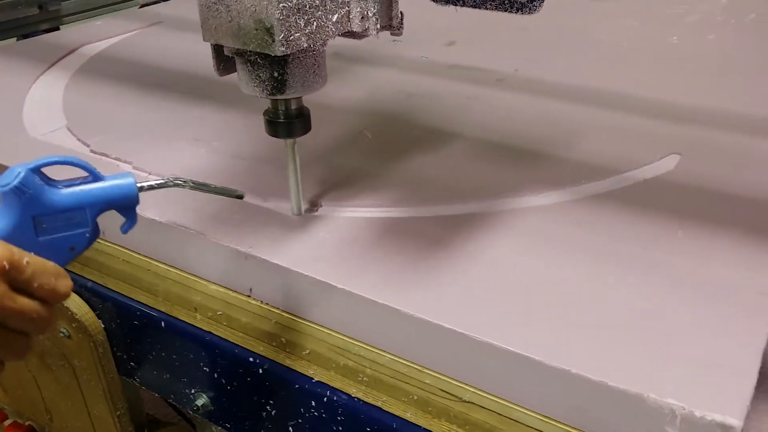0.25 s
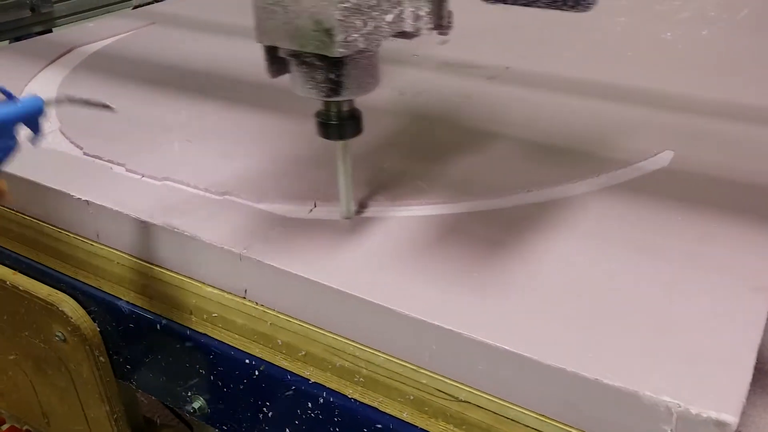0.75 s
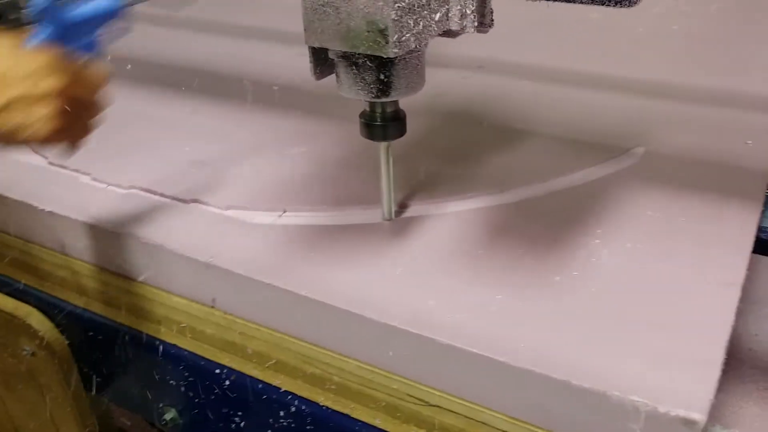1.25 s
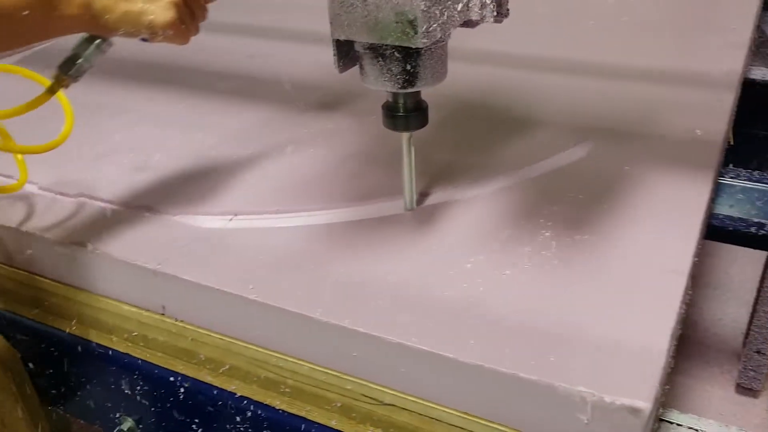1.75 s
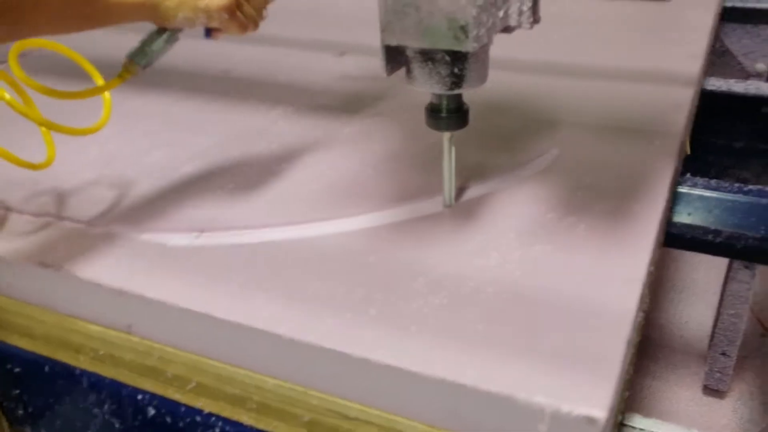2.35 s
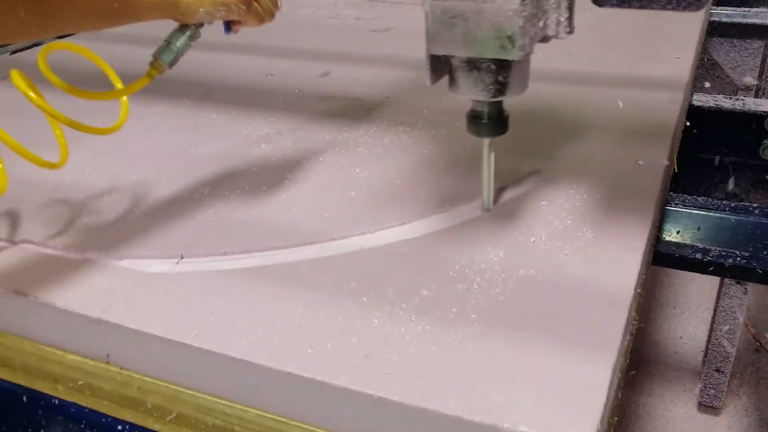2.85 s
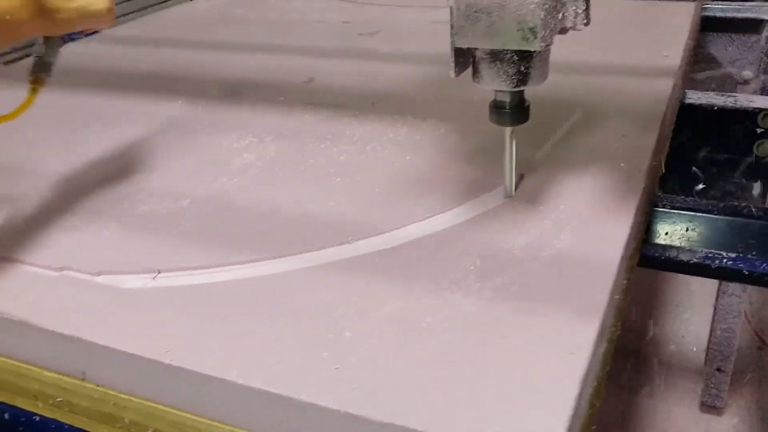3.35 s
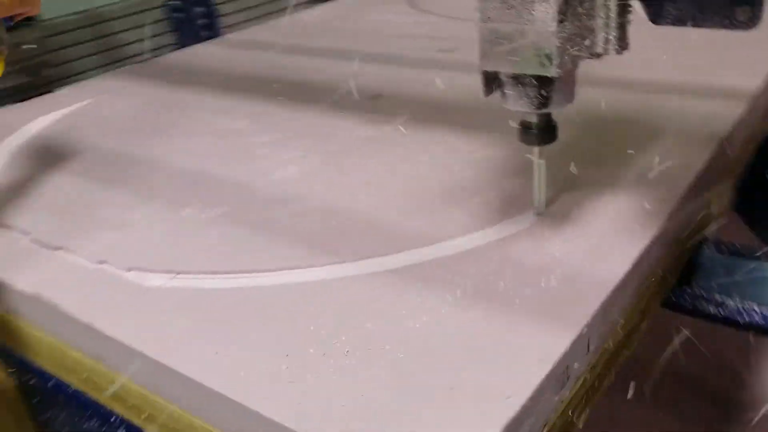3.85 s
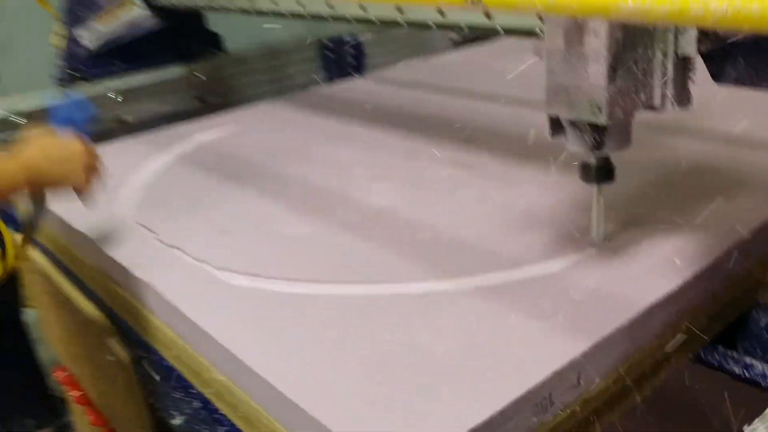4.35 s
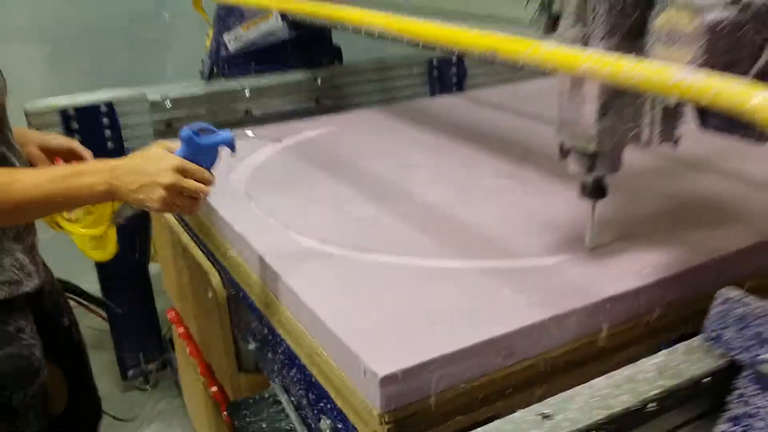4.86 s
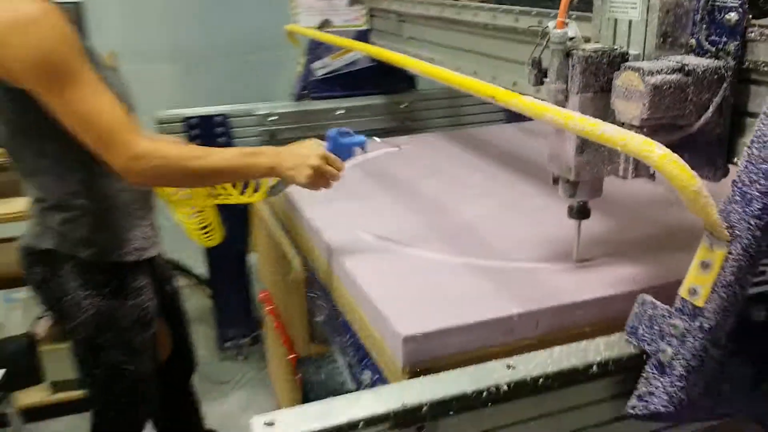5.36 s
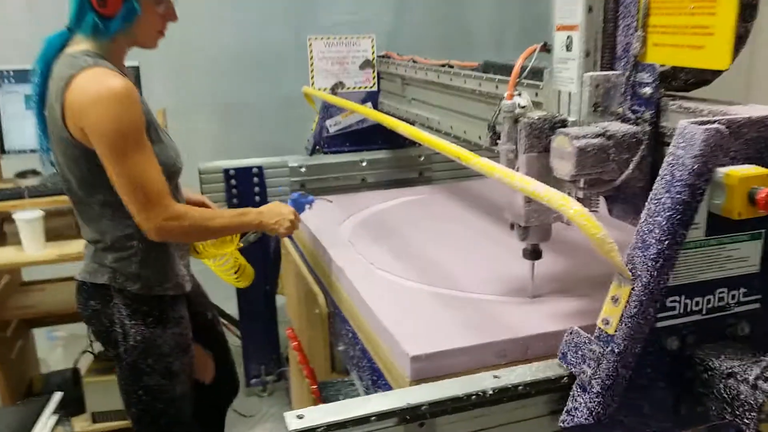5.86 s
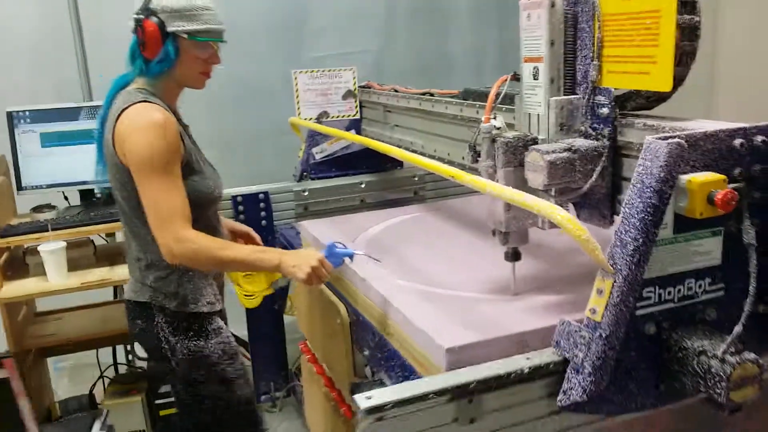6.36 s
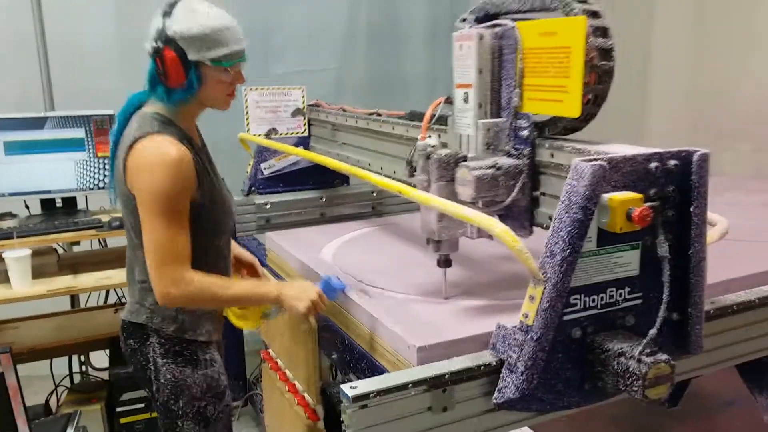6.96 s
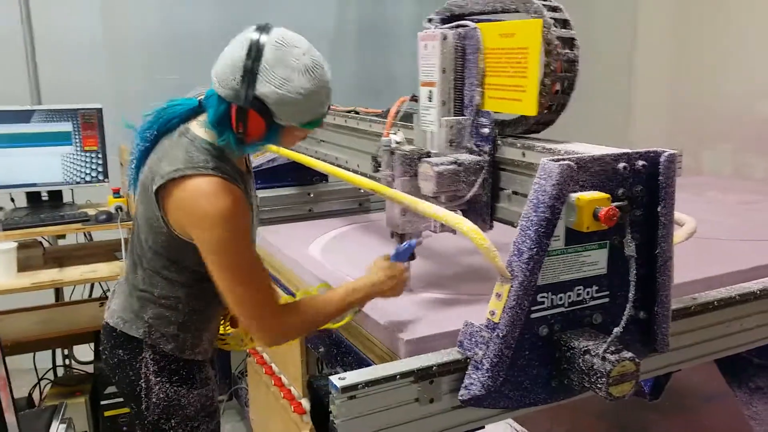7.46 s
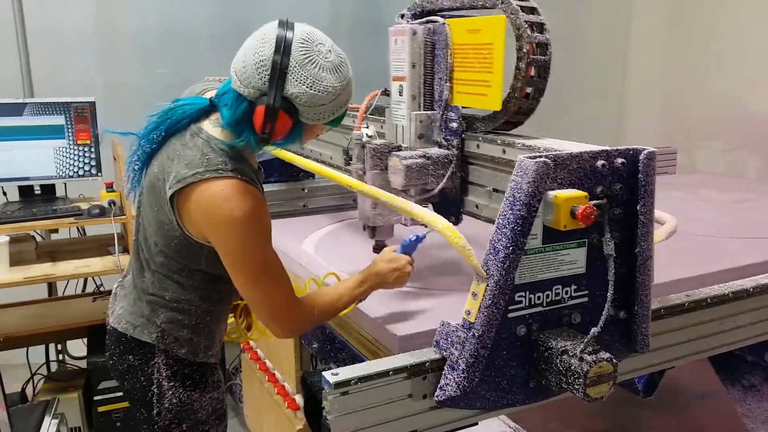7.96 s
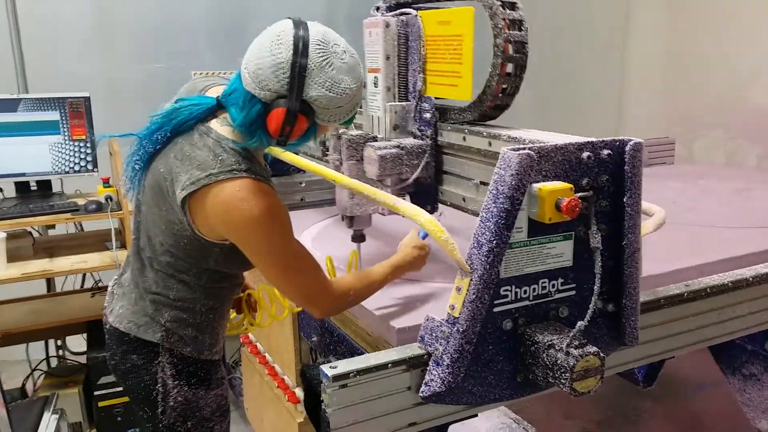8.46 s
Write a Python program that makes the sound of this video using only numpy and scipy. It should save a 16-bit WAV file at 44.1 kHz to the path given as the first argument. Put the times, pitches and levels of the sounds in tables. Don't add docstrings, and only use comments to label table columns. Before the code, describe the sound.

A router spindle whines steadily throughout, about 300 hertz with higher buzzing overtones and a fine gritty rasp of foam being torn. At 0.15 s a loud bright air-gun hiss opens, easing and fading by 1.4 s. A second squeeze starts near 1.5 s, pulsing harder at 2.3 to 2.5 s, dipping, then blasting strongly from 2.9 s, with splashes, short hollow whoops from the groove and a low wind thump at 3.14 s. The hiss dies by 4.1 s; the cutter labours with a rough buzz until 4.5 s and shop hum and rumble emerge. Air returns at 5.1 s in a long, steadier hiss to 7.2 s, then a short burst from 7.65 to 8.2 s with a low whoop, and another begins at 8.5 s, cut off at the end. Handheld microphone, stronger on the right, with slightly watery, compressed background.

```python
import sys
import numpy as np
from scipy import signal
from scipy.fft import rfft, irfft, next_fast_len
from scipy.io import wavfile
from scipy.ndimage import uniform_filter1d

SR = 44100
rng = np.random.default_rng(int(sys.argv[2]) if len(sys.argv) > 2 else 0)


def amplitude_ratio(level_db):
    exponent = np.asarray(level_db, float) / 20
    return 10 ** exponent


def wav_out(sig):
    wavfile.write(sys.argv[1], SR, np.round(np.clip(np.atleast_2d(sig).T, -1, 1) * 32767).astype(np.int16))


N = 384993

# (time [s], flow [dB], share striking board [dB], loudest
# band [Hz], focus [dB])
SQUEEZES = [
    (0, -32.5, -7, 8000, -8),
    (.16, -25.5, -4, 7300, -3),
    (.22, -18, -9.5, 7860, -1),
    (.36, -18.5, -11, 7300, 3),
    (.56, -17.5, -12, 9700, 1.5),
    (.72, -19.5, -16.5, 8000, -1.5),
    (1.03, -22, -7, 8100, -1.5),
    (1.08, -29, -4, 7200, 3.5),
    (1.38, -33.5, -2.5, 7700, -4),
            (1.47, -29.5, -6, 7100, 1.5),
    (1.56, -18.5, -10, 10400, 0.5),
    (1.66, -20, -7.5, 8600, 4),
    (1.82, -20.5, -5, 8800, 0),
    (2.05, -18, -5.5, 8260, 3.5),
    (2.11, -19.5, -9.5, 8700, 5),
            (2.26, -19, -6, 7900, 3),
    (2.295, -15.5, -8.5, 8260, 3.5),
    (2.47, -16.5, -8.5, 7900, 4.8),
    (2.53, -20.5, -7.5, 9050, 1),
            (2.74, -21, -8, 9700, -1),
    (2.84, -20, -8.5, 9300, 5),
    (2.909, -16, -11.5, 8000, 2.5),
    (3.04, -15.5, -26, 10300, 6),
    (3.3, -17, -9, 8750, 1),
    (3.67, -22, -7, 8760, 1),
    (4.0, -24, -15.5, 7760, -2.5),
    (4.13, -36.5, -3, 7640, 5),
    (4.5, -35, -13, 7300, 2.5),
            (4.58, -45.5, -9, 6900, 3.6),
    (4.9, -36, -10.5, 7300, 10),
    (5.12, -25, -7, 7900, 6.9),
    (5.22, -17.5, -10.5, 7430, 8.9),
    (5.4, -19, -11.5, 7600, 9.2),
    (5.78, -21, -13, 9130, 0.81),
    (6.538, -22, -9, 8550, 4.4),
    (6.78, -20.5, -10, 9030, 4.2),
    (7.16, -21, -9.5, 9000, 2.6),
            (7.4, -32, -1.5, 7560, 2.1),
    (7.62, -34, -3, 7900, 3.1),
    (7.645, -23, -8.5, 7640, 7),
    (7.8, -20, -5.5, 8250, 6.2),
    (8.09, -21, -6, 8800, 7.3),
    (8.3, -33, -5, 8300, 3.5),
            (8.485, -34.5, -5, 8200, 6.9),
    (8.52, -29, -3.5, 7950, 8.1),
    (8.66, -20, -11, 8400, 3.2),
    (8.73, -19.5, -13.5, 8700, 3.9),
]
# (time [s], length [s], roar [dB],
# spent air at camera [dB], splash [dB])
SWEEPS = [(0.135, 0.12, -44, -38.5, -42), (0.671, 0.042, -30, -34.5, -26), (1.543, 0.03, -32.5, -55, -27),
          (1.612, 0.083, -29, -69, -22), (2.03, 0.047, -58, -61, -42), (2.144, 0.029, -60, -41.5, -48),
          (2.696, 0.077, -44.5, -60, -36), (2.907, 0.053, -41.5, -72.5, -21),
          (2.982, 0.12, -34.5, -36.5, -30.5), (3.16, 0.063, -36.5, -36.5, -28), (5.15, 0.3, -69, -34, -44),
          (6.956, 0.12, -40.5, -61, -30.5), (7.798, 0.14, -32, -47, -32.5), (8.006, 0.035, -32.5, -73, -23)]
# (time [s], length [s], frequency [Hz], level [dB])
WHOOPS = [
    (1.326, .12, 3350, 9),
    (1.586, 0.09, 2740, 4),
    (2.905, 0.055, 4850, 6),
    (7.782, 0.25, 713, 9.5),
    (7.99, 0.037, 3740, 8),
]
# (frequency [Hz], level [dB/Hz])
HISS_SPECTRUM = [(2500, -20), (4000, -10.5), (5000, -5.5), (6000, -5), (7600, -2), (9000, -3), (10500, -1),
                 (12000, -4), (14400, -6), (15000, -26)]
SPLASH_SPECTRUM = [(1500, -46.5), (1950, -7), (2150, -8), (2500, -3.5), (3200, -2.5), (5000, -5.5),
                   (7000, -5), (9000, -33.5)]
ROAR_SPECTRUM = [(500, -14), (800, -7.5), (1150, 0), (1300, -5.5), (1700, -1.5), (1900, -10), (2300, -2),
                 (3200, -34.5)]
# (time [s], delay [ms], ripple [dB])
BOUNCE = [(0, 0.6, -1), (.55, 0.88, 1), (1.2, 0.53, -1), (1.9, 0.27, -1.5), (2.3, 0.24, -1), (2.6, 0.31, 0),
          (2.85, 0.43, 2), (3.05, 0.47, 3), (3.4, 0.41, 1), (3.75, .39, -1), (4.0, 0.33, 0),
          (7.6, 0.44, 0.5), (7.95, 1, -4.5), (8.3, .5, 0.5)]
# (time [s], level [dB])
SHADE = [(0, -6.5), (1.0, -0.5), (2.4, -1.5), (3.3, -1), (4.2, -1), (5.4, 3.5), (5.8, 0.5), (7.2, -1.5),
         (8.73, -0.5)]
# (time [s], flute bite [dB], bite sharpness [dB], runout [dB], unbalance [dB])
CUT = [(0, -36.5, -11.5, 0.5, -10), (.4, -46, 3, 0.5, 1), (.75, -38, -2, -9.5, -7.5),
       (1.2, -35, -6.5, -11, -6.5), (1.55, -36, -7.5, -7.5, -9.5), (1.9, -41.5, -3, -3, -3),
       (2.5, -51, 3.5, 6, 3.5), (2.9, -53, 9, 10.5, 6), (3.45, -54.5, 5.5, 7, 6),
       (3.9, -44.5, 0.5, 0.5, -5), (4.6, -56.5, -2.5, -2, 9), (5.1, -44, 3.5, 0, 2),
       (5.5, -45, -11, -11, -9), (6.3, -53, 5, 1, -3.5), (6.9, -45, -4.5, -1, -17.5),
       (7.3, -38, -13, -6, -10.5), (7.75, -39, -11, -9, -9.5), (8.2, -46.5, -5, -7.5, -15)]
# (start [s], end [s], load [dB])
LOADS = [
    (-.1, 0.2, 9.5),
    (4.02, 4.541, 15),
]
# (shaft order, level [dB])
UPPER_ORDERS = [(5, -8), (6, -6.5), (7, -6.5), (8, -6.5), (9, -5), (10, -9), (12, -9), (14, -14),
                (16, -5.5), (17, -2), (18, -7), (19, -3.5), (20, -3), (21, -4), (22, 1), (23, -2), (24, -2),
                (26, -4), (27, -1), (28, -3), (29, -6), (30, -9)]
# (frequency [Hz], level [dB/Hz])
GRIT_SPECTRUM = [(900, -33), (1700, -19), (2400, -21.5), (3000, -4), (3600, -14), (4500, -6), (5400, -8),
                 (6200, -6.5), (9000, -3), (15000, -59.5)]
# (multiple of flute rate, level [dB])
STROKES = [(3, -10.5), (4, -6), (5, -8.5), (6, -4), (7, -9.5), (8, -9.5), (9, 0), (10, -8), (11, -14)]
# (time [s], flute rate [strokes/s])
FLUTE_RATE = [(0, 590), (.3, 596), (4.0, 586), (4.2, 590), (4.38, 594), (4.5, 598.5), (8.73, 599)]
# (time [s], peak [dB], length [s])
GUSTS = [
    (3.139, -12, 0.0033),
    (3.147, -8, 0.007),
    (1.3, -40, 0.013),
    (4.9, -34, 0.018),
]
# (frequency [Hz], level [dB], width [Hz])
DRIVE_TONES = [(120.2, 0, 1.5), (815, 0, 10), (870, -54, 3), (6540, -60, 8.6), (6780, -55, 16)]
# (time [s], hum [dB], drone [dB], gantry motor [dB])
HEARD = [(0, -46, -57.5, -49), (.4, -63.5, -57, -60), (1.1, -50, -57.5, -55), (1.5, -52, -52, -61),
         (1.9, -59, -57.5, -59), (3.4, -66, -66, -57), (3.75, -63, -48.5, -56), (4.2, -55, -57, -64),
         (4.6, -47, -56.5, -52.5), (5.2, -39.5, -48.5, -45), (5.6, -56.5, -62.5, -43),
         (6.1, -49.5, -53, -50.5), (6.45, -45, -63.5, -56), (6.7, -49, -47.5, -46.5),
         (7.0, -58, -55.5, -59), (7.3, -42, -53, -65), (7.7, -44, -45, -48), (8.2, -54, -55, -59)]
# (frequency [Hz], level [dB/Hz])
RUMBLE_SPECTRUM = [(15, -57), (30, -9), (86, 0), (113, -3), (129, 4.5), (155, -15.5), (192, -5.5),
                   (241, -9.5), (290, -3), (380, -29.5), (640, -120)]
# (time [s], nearness [dB], left port earlier [ms], jet left-right [dB])
CAMERA = [(0, 7.5, 0.15, -13), (.9, 1.5, 0.21, -9.5), (1.2, 0.5, 0.044, -8.5), (2.8, 0, 0.027, -7.5),
          (3.6, 1.5, 0.17, -8.5), (4.1, 1.5, -0.052, -11), (4.7, -8, -0.085, -8.5), (5.2, 8.5, -0.064, -7),
          (5.7, -6, 0.025, -11.5), (6.5, -7.5, 0.079, -11.5), (7, -3, 0.074, -13), (7.6, -0.5, 0.0036, -12),
          (8.2, -2, 0.075, -10.5), (8.73, -21, 0.012, -13)]
# (frequency [Hz], left-right likeness [0-1])
ALIKE = [(60, 0.95), (600, 0.8), (1500, 0.35), (4000, 0.36), (8000, 0.2), (12000, 0.18)]
# (frequency [Hz], left-right [dB])
LEAN = [(40, -2), (200, -5), (700, -6.5), (2300, -9.5), (4300, -5.5), (8000, -8), (13000, -5.5)]
# (frequency [Hz], level [dB])
LEFT_PORT = [(1600, 1), (2500, -2), (5200, -1), (6600, 5.5), (7600, -1.5), (10600, -3.5), (12000, -1),
             (14400, 2)]
# (frequency [Hz], level re moment's loudness [dB])
STARVE = [(50, -23), (300, -23.5), (450, -19), (600, -25), (1000, -20), (1150, -22.5), (1330, -21.5),
          (1650, -23.5), (1900, -21.5), (2150, -24), (5000, -31)]
# (frequency [Hz], level [dB/bin])
FAINT = [(7000, -73), (8500, -52), (10500, -47), (12500, -41), (14400, -48), (14650, 0)]
# (start [s], end [s], low [Hz], high [Hz])
DROPOUTS = [(.35, .44, -2, 540), (.44, .62, -9, 210), (.62, .78, 0, 139.7), (1.58, 2.06, -2, 230),
            (2.29, 2.46, -6, 555), (2.46, 2.54, -3, 200), (2.899, 2.99, 0, 500), (3.095, 3.185, 4300, 4640),
            (3.22, 3.33, 330, 600), (3.3, 3.55, 0, 240), (3.6, 3.75, -2, 240), (3.404, 3.56, 0, 560),
            (3.56, 3.6, 237, 540), (3.57, 3.72, 340, 549), (5.657, 5.77, 953, 1530),
            (7.798, 7.85, 170, 400), (7.85, 7.94, 0, 250), (7.9, 7.95, 0, 420), (7.93, 8.0, 200, 480),
            (6.079, 6.3, 345, 545), (2.0, 2.16, 670, 800), (.72, 1.0, 345, 540), (8.0, 8.123, -11, 230)]
# (frequency [Hz], level re neighbouring bins [dB])
COARSE = [(200, -13), (1400, -9), (3400, -7), (5700, -9), (7500, -14), (10000, -14), (13000, -8)]

FRAME, HOP, HOP_OFFSET = 512, 1024, 191
ROAR_PER_SHARE_DB, ROAR_DB, IDLE_ROAR_DB = 1.65, -7.5, -43.5
TILT_DB, TILT_PER_AIM_OCT_DB, TILT_PER_FLOW_DB = -1, 4.8, 0.2
GROOVE_HZ, GROOVE_DROP_HZ_PER_DB = 4000, 80
SHADE_HZ, LEFT_FOCUS, STREAK_DB = 11460, 0.33, 0.87
SHAFT_HZ = 299.75
ORDER_DB = (0.3, 0.15, 0.24, 0.33)
WHINE_DB, BRAKE_DB_PER_DB = -45.5, 0.07
GRIT_DB, GRIT_PER_BITE_DB = -39.5, 0.3
STROKE_DB, STROKE_LEFT_DB = -46.5, -3.5
LOAD_EDGE_S, SQUEAL_RISE_DB_PER_S = 0.025, 18
HEARD_LEAST_DB, HUM_DB, MOTOR_DB, DRONE_DB = -66, -1.5, -3.5, 1.5
# level, share of nearness, ducking per dB of flow, spent air heard in each
SHOP_DB, SHOP_NEAR = (-49, -55, -47.5), (0.068, 0.17, 0.63)
DUCK, SPILL_DB = (1, 0.22, 0.57), (-5, -17.5, -7)
QUIET_DB, DUCK_NEAR = -25, 0.68
LEFT_STARVE_DB = 1.07


def unit(x):
    return x / np.sqrt(np.mean(x ** 2) + 1e-20)


def along(points, hz):
    f, v = np.transpose(points)
    return np.interp(np.log(hz + 1), np.log(f + 1), v)


def curves(rows, t=None):
    s, *cols = np.transpose(rows)
    t = np.arange(N) / SR if t is None else t
    return [np.interp(t, s, col) for col in cols]


def wobble(rate_hz, channels=1):
    at = np.arange(N) * rate_hz / SR
    knots = rng.standard_normal((channels, int(N * rate_hz / SR) + 4))
    return np.array([np.interp(at, np.arange(len(row)), row) for row in knots])


def filtered(x, response):
    m = next_fast_len(N + 8192)
    return irfft(rfft(x, m) * response(np.fft.rfftfreq(m, 1 / SR)), m)[..., :N]


def smooth(x, hz_bins, frames):
    return uniform_filter1d(uniform_filter1d(x, size=hz_bins, axis=-2), size=frames, axis=-1)


def rush(spectrum, patchy_db, shape_db=None, ports_db=None):
    hz, t, z = signal.stft(rng.standard_normal((2, N)), SR, nperseg=FRAME)
    rows = hz[:, None]
    patches = unit(smooth(rng.standard_normal(z.shape[1:]), 6, 12))
    moving_db = shape_db(rows, t) if shape_db else 0 * t
    colour = amplitude_ratio(along(spectrum, hz)[:, None] + moving_db)
    colour = colour / np.sqrt(np.mean(colour ** 2, axis=0)) * amplitude_ratio(patchy_db * patches)
    turn = np.arccos(np.clip(along(ALIKE, hz), 0, 1))[:, None] / 2
    mid = z[0] * np.cos(turn) * colour
    side = z[1] * np.sin(turn) * colour
    lead = np.exp(2j * np.pi * rows * curves(CAMERA, t)[1] / 1000)
    pair = np.array([(mid + side) * lead, mid - side])
    if ports_db:
        pair = pair * amplitude_ratio(ports_db(rows, t))
    return unit(signal.istft(pair, SR, nperseg=FRAME)[1][:, :N])


def band(lo_hz, hi_hz):
    return [(lo_hz * 0.93, -40), (lo_hz, 0), (hi_hz, 0), (hi_hz * 1.1, -40)]


def narrow(lines):
    def shape(f):
        return sum(amplitude_ratio(db) / np.sqrt(width) / (1 + ((f - hz) / width) ** 2) for hz, db, width in lines)
    return np.sqrt(SR / np.pi) * filtered(rng.standard_normal((2, N)), shape)


def jet(t=None):
    return curves(SQUEEZES, t)


def sweeps(axis):
    t = np.arange(N) / SR
    return sum(amplitude_ratio(row[axis]) * np.exp(-((t - row[0]) / row[1]) ** 2) for row in SWEEPS)


def whoops(hz, t):
    return sum(db * np.exp(-((t - s) / length) ** 2 - ((hz / ring_hz - 1) / 0.35) ** 2)
               for s, length, ring_hz, db in WHOOPS)


def groove(hz, t):
    hollow_hz = GROOVE_HZ - GROOVE_DROP_HZ_PER_DB * jet(t)[1]
    return whoops(hz, t) + 3 * np.exp(-((hz - hollow_hz) / 600) ** 2)


def beam(hz, t):
    _, _, peak_hz, focus_db = jet(t)
    return focus_db * np.exp(-((hz - peak_hz) / 900) ** 2)


def aim(hz, t):
    flow_db, _, peak_hz, _ = jet(t)
    tilt = TILT_DB + TILT_PER_FLOW_DB * (flow_db - QUIET_DB) + TILT_PER_AIM_OCT_DB * np.log2(peak_hz / 8300)
    return beam(hz, t) + tilt * np.log2(np.clip(hz, 3000, 15000) / 8000)


def hiss_at_ports(hz, t):
    delay_ms, ripple_db = curves(BOUNCE, t)
    ripple = ripple_db * np.cos(2 * np.pi * hz * delay_ms / 1000)
    unfocus = (LEFT_FOCUS - 1) * beam(hz, t)
    shade = curves(SHADE, t)[0] / (1 + np.exp((SHADE_HZ - hz) / 150))
    streaks = unit(smooth(rng.standard_normal((2, len(hz), len(t))), 3, 40))
    return np.array([ripple + unfocus, 0.67 * ripple + shade]) + STREAK_DB * streaks


def air_gun():
    flow_db, board_db, *_ = jet()
    near_db, _, pan_db = curves(CAMERA)
    flutter = wobble(16)

    hiss_gain = amplitude_ratio(flow_db + 0.3 + 0.036 * flutter + 0.52 * wobble(90))
    hiss = hiss_gain * rush(HISS_SPECTRUM, patchy_db=1.5, shape_db=aim, ports_db=hiss_at_ports)
    hiss = hiss * amplitude_ratio(np.array([pan_db + 8.5, -pan_db - 6.5]) / 2)

    splash_gain = np.hypot(amplitude_ratio(flow_db + board_db + 1.12), sweeps(axis=4))
    splash_gain = splash_gain * amplitude_ratio(0.1 * flutter + 0.76 * wobble(50))
    splash = splash_gain * rush(SPLASH_SPECTRUM, patchy_db=1.0, shape_db=groove)

    blown = amplitude_ratio(flow_db + ROAR_PER_SHARE_DB * board_db + ROAR_DB)
    idle = amplitude_ratio(IDLE_ROAR_DB + 0.48 * near_db)
    roar_gain = np.sqrt(blown ** 2 + idle ** 2 + sweeps(axis=2) ** 2) * amplitude_ratio(0.12 * wobble(17))
    roar = roar_gain * rush(ROAR_SPECTRUM, patchy_db=1.5, shape_db=whoops)
    return hiss + splash + roar


def shaft_tones(turn):
    bite_db, sharp_db, runout_db, shake_db = curves(CUT)
    drive_db = bite_db + shake_db, bite_db, bite_db + runout_db, bite_db + sharp_db
    tones = 0
    for k, db in enumerate(ORDER_DB):
        level = amplitude_ratio(db + drive_db[k] + 1.1 * wobble(4.5, channels=2))
        tones = tones + level * np.sin((k + 1) * turn + 0.7 * wobble(4, channels=2))
    return tones


def shaft_whine():
    fading = [(k, -6 - 0.4 * (k - 30)) for k in range(31, 48)]
    return narrow([(k * SHAFT_HZ, db, 4 + 0.21 * k) for k, db in UPPER_ORDERS + fading])


def flute_grit(turn):
    bite = np.exp(1.8 * np.cos(2 * turn) + 0.85 * np.cos(turn))
    return unit(filtered(rng.standard_normal((2, N)) * bite, lambda f: amplitude_ratio(along(GRIT_SPECTRUM, f))))


def flute_strokes():
    t = np.arange(N) / SR
    flutes = 2 * np.pi * np.cumsum(curves(FLUTE_RATE)[0]) / SR
    squeal_db = SQUEAL_RISE_DB_PER_S * np.clip(t - 4.45, -.45, 0)
    even = 0
    for k, db in STROKES:
        level = amplitude_ratio(db + (k == 9) * squeal_db + 4.1 * wobble(18 + 2.8 * k, channels=2))
        even = even + level * np.sin(k * flutes + 1.6 * wobble(14 + 2.5 * k, channels=2))
    skirts = narrow([(k * 592 - 60, db, 70) for k, db in STROKES])
    return unit(unit(even) + amplitude_ratio(3) * unit(skirts)) * amplitude_ratio([[STROKE_LEFT_DB], [0]])


def spindle():
    t = np.arange(N) / SR
    bite_db, near_db = curves(CUT)[0], curves(CAMERA)[0]
    load_db = sum(db * np.clip(np.minimum(t - a, b - t) / LOAD_EDGE_S, 0, 1) for a, b, db in LOADS)
    turn = 2 * np.pi * SHAFT_HZ * t
    whine_gain = amplitude_ratio(WHINE_DB + .5 * near_db - BRAKE_DB_PER_DB * load_db)
    grit_gain = amplitude_ratio(GRIT_DB + GRIT_PER_BITE_DB * (bite_db - bite_db.mean() + load_db))
    stroke_gain = amplitude_ratio(STROKE_DB + 0.11 * near_db + load_db)
    cutting = grit_gain * flute_grit(turn) + stroke_gain * flute_strokes()
    return shaft_tones(turn) + whine_gain * shaft_whine() + cutting


def gusts():
    t, push = np.arange(N) / SR, np.zeros((2, N))
    puff = unit(filtered(rng.standard_normal((2, N)), lambda f: f / (f + 60) / (1 + (f / 800) ** 2)))
    for s, db, length in GUSTS:
        u = (t - s) / length
        push += amplitude_ratio(db) * np.exp(-4 * u * u) * (0.25 * puff - 1.1 * u)
    return push * amplitude_ratio([[-6], [4]])


def drives():
    hum_db, _, motor_db = np.clip(curves(HEARD), HEARD_LEAST_DB, 0)
    hum = amplitude_ratio(hum_db + HUM_DB) * unit(narrow(DRIVE_TONES[:1]))
    motor = amplitude_ratio(motor_db + MOTOR_DB) * unit(narrow(DRIVE_TONES[1:2]))
    return hum + motor + narrow(DRIVE_TONES[2:])


def ducked():
    return np.clip(jet()[0] - QUIET_DB + DUCK_NEAR * curves(CAMERA)[0], 0, None)


def shop():
    near_db, over_db, swell = curves(CAMERA)[0], ducked(), sweeps(axis=3)
    gains = [np.hypot(amplitude_ratio(db + near * near_db - duck * over_db), amplitude_ratio(spill_db) * swell)
             for db, near, duck, spill_db in zip(SHOP_DB, SHOP_NEAR, DUCK, SPILL_DB)]
    rumble = unit(filtered(rush(band(20, 410), patchy_db=1.0), lambda f: amplitude_ratio(along(RUMBLE_SPECTRUM, f))))
    drone = rush(band(328.4, 520), patchy_db=4.0)
    fan = rush(band(593, 867), patchy_db=-2.5)
    heard_db = np.clip(curves(HEARD)[1], HEARD_LEAST_DB, 0)
    drone_gain = np.hypot(amplitude_ratio(heard_db + DRONE_DB), 0.37 * gains[1])
    return gains[0] * amplitude_ratio(0.33 * wobble(2.9)) * rumble + drone_gain * drone + gains[2] * fan


def scene():
    return air_gun() + spindle() + gusts() + drives() + shop()


def at_ports(dry):
    def response(f):
        lean_db = along(LEAN, f)
        ports_db = np.array([lean_db + 2 * along(LEFT_PORT, f), -lean_db]) / 2
        return amplitude_ratio(ports_db) * f * f / (f * f + 45 * 45)
    return filtered(dry, response)


def starved(x):
    n, k = np.arange(2 * HOP) + .5, np.arange(HOP) + .5
    window = np.sin(np.pi * n / HOP / 2)[:, None]
    basis = np.sqrt(2 / HOP) * window * np.cos(np.pi / HOP * np.outer(n + HOP / 2, k))
    padding = (HOP + HOP_OFFSET, 2 * HOP - (N + HOP_OFFSET) % HOP)
    halves = np.pad(x, ((0, 0), padding)).reshape(2, -1, HOP)
    c = np.concatenate([halves[:, :-1], halves[:, 1:]], axis=2) @ basis
    hz, t = k * SR / HOP / 2, (np.arange(c.shape[1]) * HOP - HOP_OFFSET) / SR

    port_db = np.reshape([LEFT_STARVE_DB, 0], (2, 1, 1))
    loudness = np.mean(c ** 2, axis=2, keepdims=True)
    limit = loudness * amplitude_ratio(2 * (along(STARVE, hz) + 15 + port_db)) + amplitude_ratio(2 * along(FAINT, hz))
    near = uniform_filter1d(c ** 2, size=4, axis=2)
    keep = near ** 5 / (near ** 5 + limit ** 5)
    for start, end, lo_hz, hi_hz in DROPOUTS:
        keep[:, (t >= start) & (t <= end)] *= (hz < lo_hz) | (hz > hi_hz)

    left, right = c * keep
    pair = np.array([left + right, left - right]) / 2
    local = uniform_filter1d(np.mean(pair ** 2, axis=0), size=16, axis=1)
    step = amplitude_ratio(along(COARSE, hz)) / .6 * np.sqrt(np.abs(local) + 1e-20)
    mid, side = np.sign(pair) * np.floor(np.abs(pair) / step + .4) * step
    frames = np.array([mid + side, mid - side]) @ basis.T
    joined = frames[:, 1:, :HOP] + frames[:, :-1, HOP:]
    return joined.reshape(2, -1)[:, HOP_OFFSET:N + HOP_OFFSET]


def low_pass(x):
    return signal.sosfilt(signal.butter(12, 15150, fs=SR, output="sos"), x)


def record(dry):
    mix = np.clip(starved(at_ports(dry)), -1, 1)
    return low_pass(mix)


dry = scene()
out = record(dry)
wav_out(out)
```